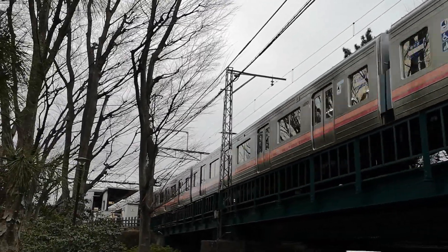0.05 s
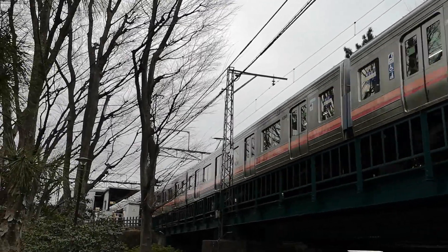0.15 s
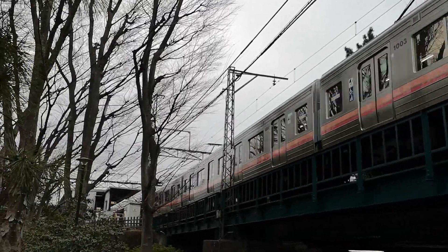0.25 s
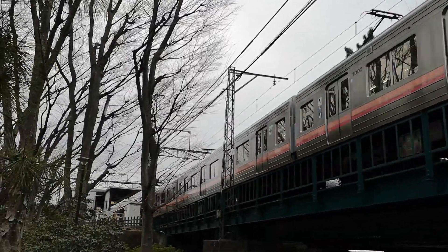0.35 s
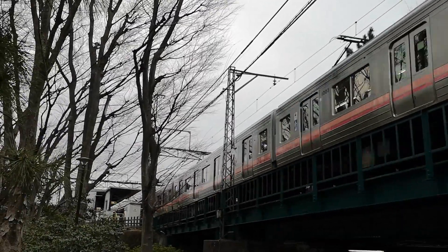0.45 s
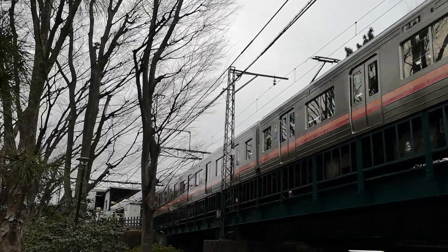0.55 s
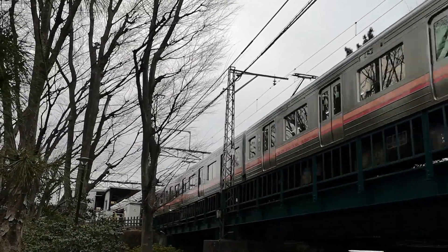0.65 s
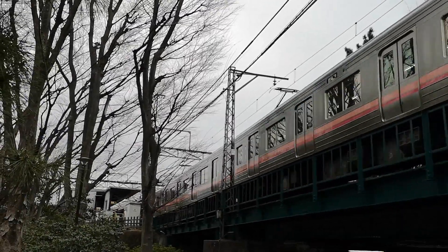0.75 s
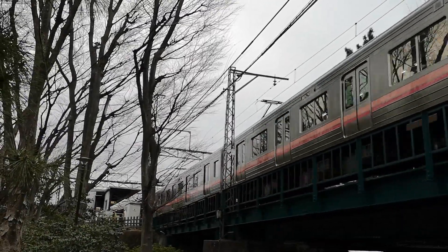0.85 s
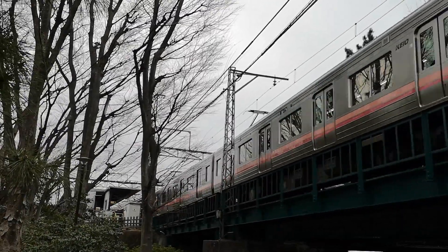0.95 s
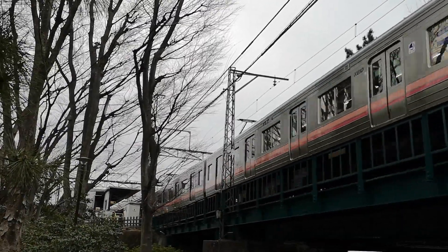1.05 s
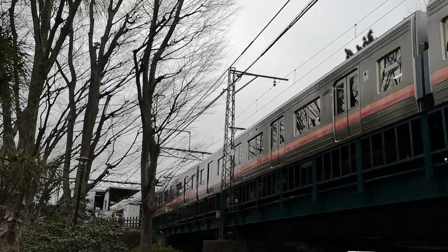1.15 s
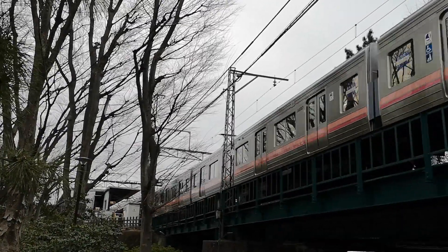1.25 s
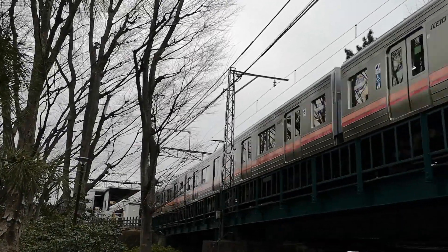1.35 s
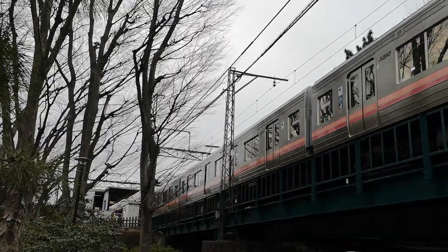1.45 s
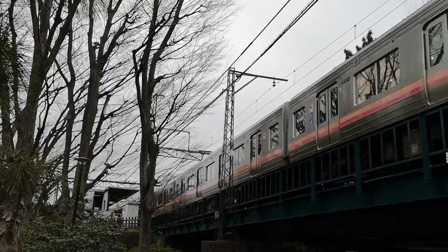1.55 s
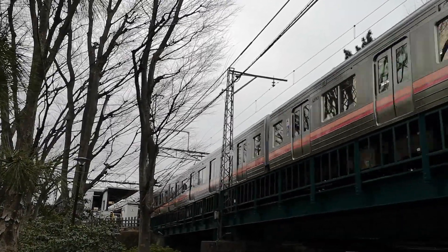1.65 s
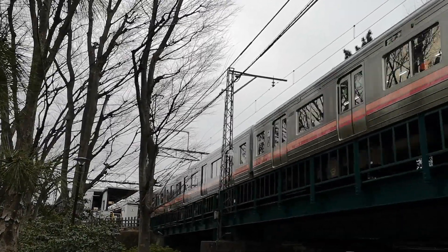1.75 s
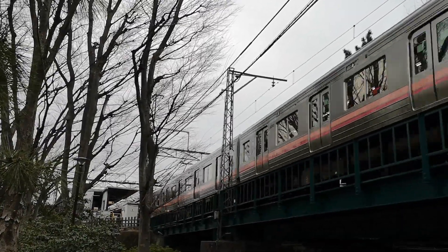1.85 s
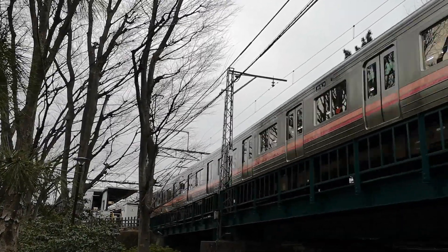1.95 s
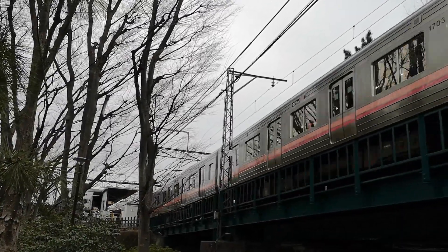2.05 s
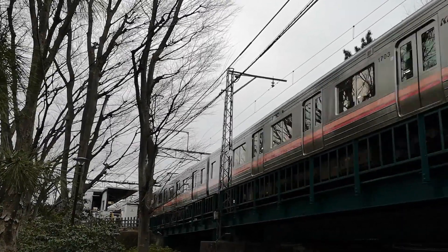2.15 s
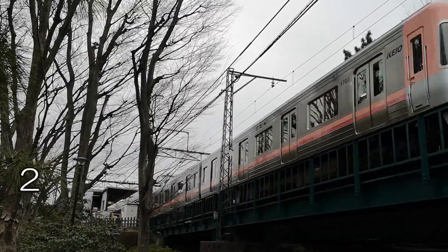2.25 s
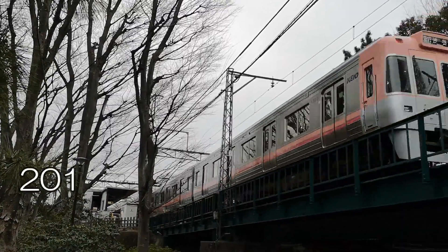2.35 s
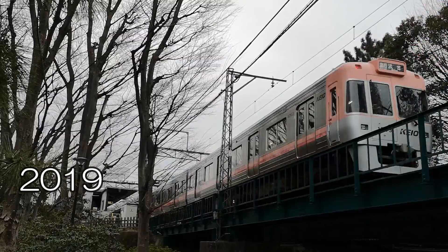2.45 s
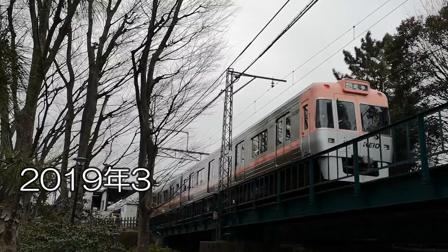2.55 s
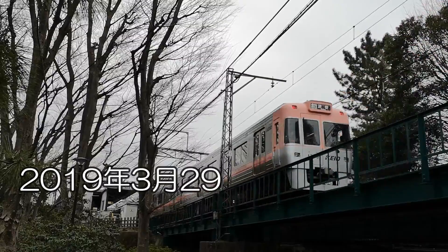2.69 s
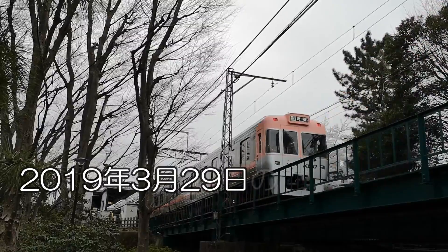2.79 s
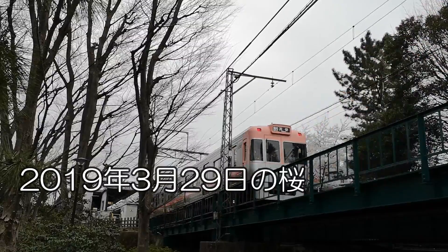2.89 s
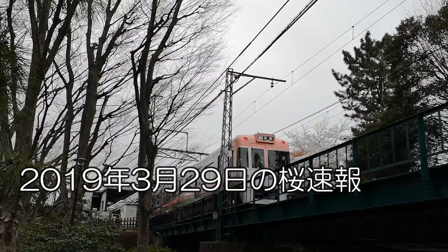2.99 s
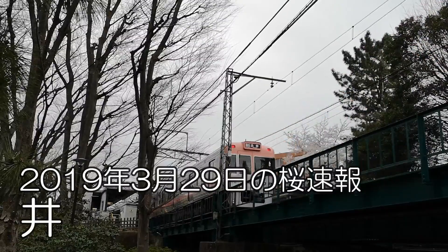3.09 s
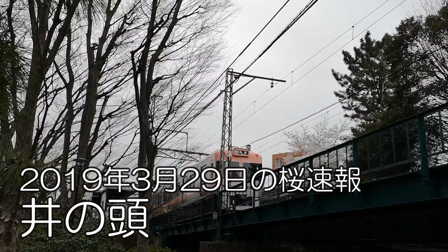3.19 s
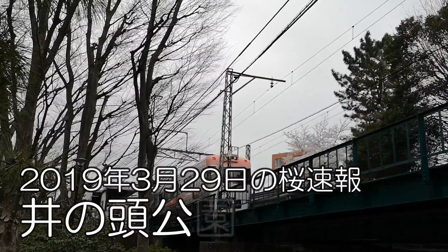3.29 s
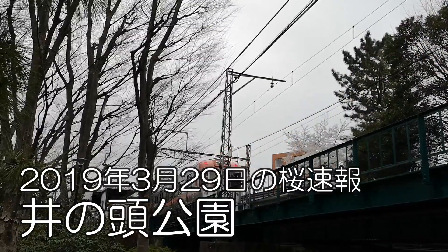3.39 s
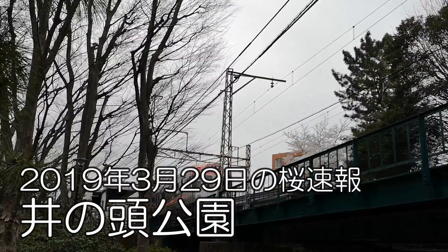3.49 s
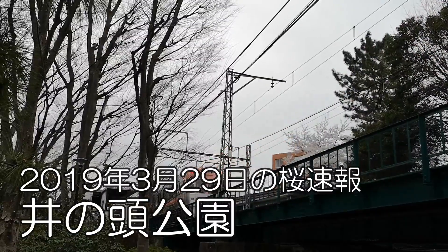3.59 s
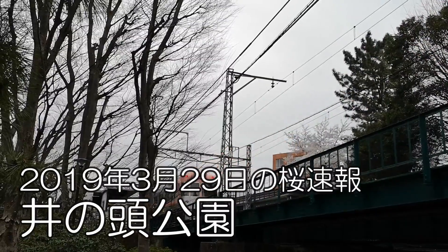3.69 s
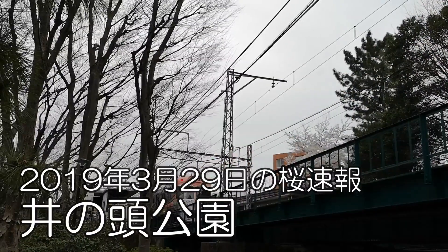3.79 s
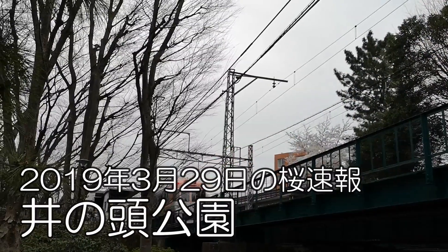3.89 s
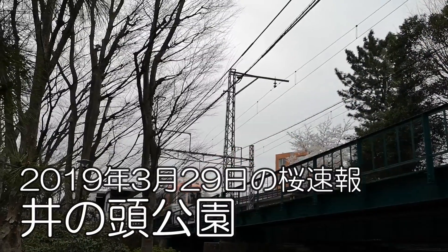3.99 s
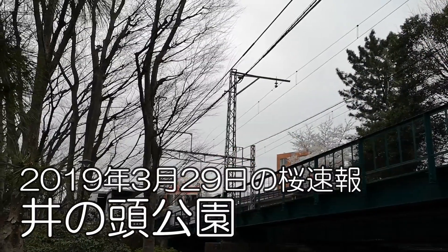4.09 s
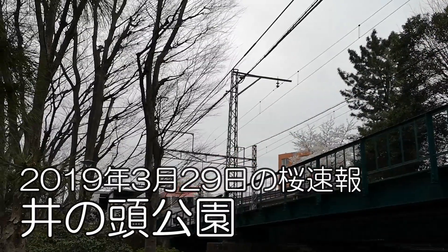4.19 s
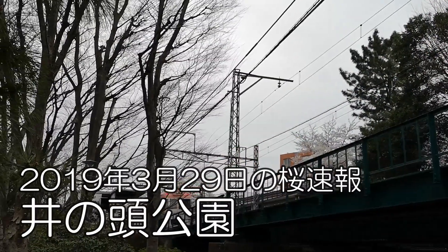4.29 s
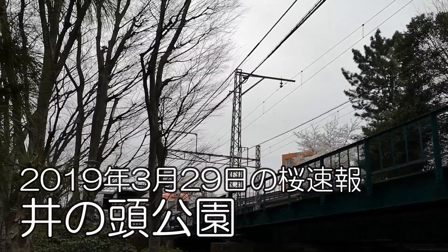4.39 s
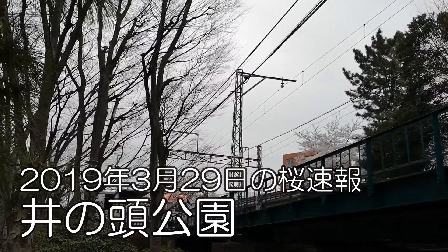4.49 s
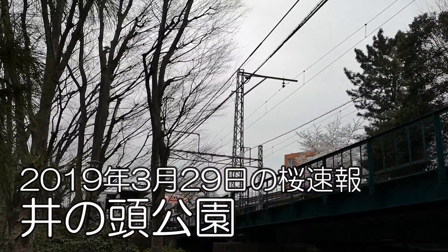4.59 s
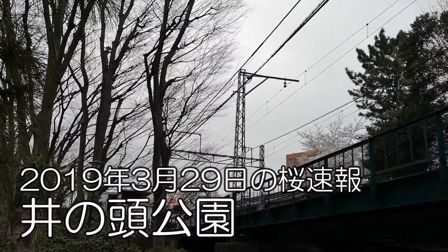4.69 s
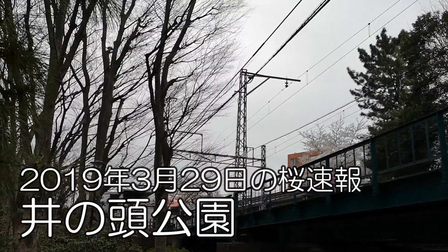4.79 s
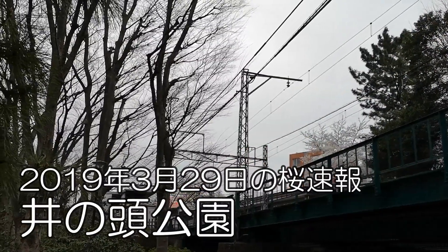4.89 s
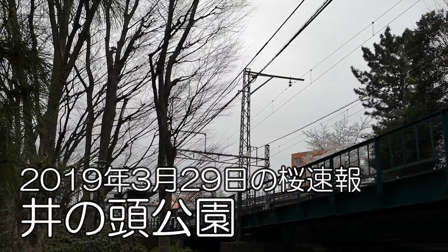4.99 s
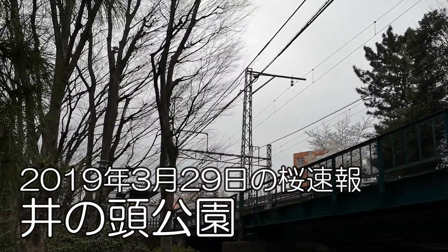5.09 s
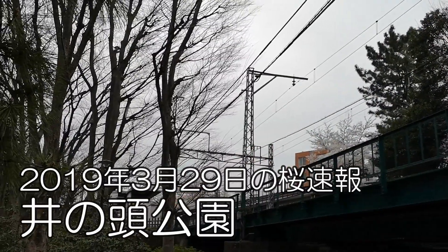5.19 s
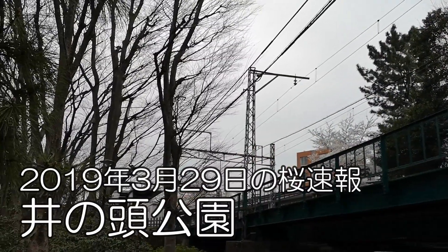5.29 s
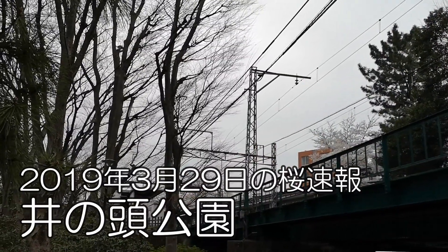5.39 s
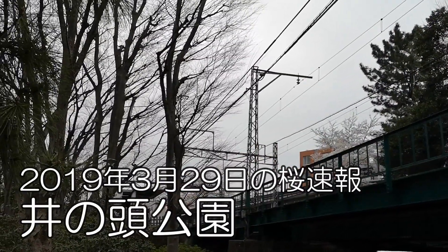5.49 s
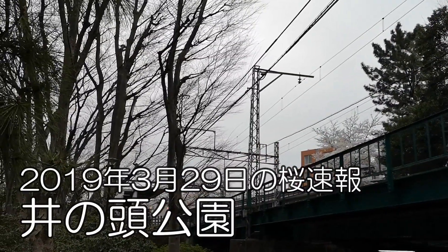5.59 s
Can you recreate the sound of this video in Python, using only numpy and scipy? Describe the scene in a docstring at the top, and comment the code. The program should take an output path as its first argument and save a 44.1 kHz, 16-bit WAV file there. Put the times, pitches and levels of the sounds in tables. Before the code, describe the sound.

An electric commuter train is already crossing a steel bridge overhead, with a booming roar, a high steady wheel ring and a hiss from the rails and wire. Deep thuds shake the girders. As the train draws away, its axles clank in pairs over a rail joint, with a few dry ticks. The roar fades into distant traffic rumble and one very faint bird whistle. Heard outdoors in stereo from just below the bridge.

```python
"""A booming, ringing roar: an electric train crosses a steel bridge overhead and draws away.
Its weight shakes the girders; rough rails set deck plates, wheels and rails ringing.
Wheel contacts hiss, current collectors fizz on the wire, loose fittings sizzle.
Bogies thud on the span and axle pairs clank over a rail joint, with a few dry ticks.
Once the train is far, a small bird whistles faintly over the rumble of distant traffic."""
import sys
import numpy as np
from scipy import signal
from scipy.io import wavfile
from scipy.ndimage import uniform_filter1d

SR = 44100
rng = np.random.default_rng(int(sys.argv[2]) if len(sys.argv) > 2 else 0)


def unload_audio(sound):
    """Save the sound as a 16-bit wav file, at the path given as the first command line argument."""
    columns = np.transpose(np.atleast_2d(sound))
    # keep every value between -1 and 1, then stretch to whole-number steps
    steps = np.round(np.clip(columns, -1, 1) * 32767)
    wavfile.write(sys.argv[1], SR, steps.astype(np.int16))


N = 248724

# Microphone pair, train overhead. Each row: frequency in Hz, coherence from 0 to 1,
# left phase lead in radians, left minus right in dB.
STEREO_OVERHEAD = [(0, 1, 0, 0), (170, .98, -.4, 0), (340, .88, -1.3, -.5), (690, .62, -2.4, -6),
                   (1030, .5, -1.8, -2.5), (1460, .25, -2.2, 2), (1900, .5, -4.1, 6), (2400, .3, -4.8, 4.5),
                   (3000, .55, -7.1, 1), (4300, .4, -10.2, 5), (5800, .36, -15.5, 11.5),
                   (7300, .36, -20.5, 11), (10500, .14, -31.5, -8), (14000, .1, -43, -3.5)]
# Change with the train far off. Each row: frequency in Hz, share of coherence kept,
# added lead in radians, added left minus right in dB.
STEREO_AWAY = [(200, 1, .3, 0), (380, .58, 2.1, 0), (690, .43, 4.6, 8), (1030, .5, 2.2, 3.5),
               (1460, 1, 2.6, -2), (2100, .5, 5.7, -2), (3000, .9, 6.5, -.5), (3700, .35, 6.5, -1),
               (5800, .4, 6.5, -3.5)]

# Noise spectra. Each row: frequency in Hz, relative density in dB.
GIRDER_SPECTRUM = [(8.8, -31), (15, -29), (60, 4.5), (97, -7), (140, -7), (217, -12.5), (300, -15.5),
                   (390, -65)]
DECK_SPECTRUM = [(88, -35), (150, 11.5), (228, -19), (366, -7.5), (433, -7), (972, -2), (1060, -1),
                 (1420, -7.5), (1900, -8.5), (2180, -36), (2440, -11.5), (4200, -25.5), (5460, -54)]
HISS_SPECTRUM = [(1880, -22), (3200, -12), (4110, -3.5), (5150, 2), (5850, 0), (6180, -4), (6940, -1),
                 (7640, -4.5), (8470, -21), (9000, -18), (11700, -59), (19800, -120)]
FIZZ_SPECTRUM = [(4710, -15), (8000, -1), (8470, -4.5), (10700, -6.5), (14400, -14.5), (15300, -18)]
TRAFFIC_SPECTRUM = [(15, 11), (35, -8), (60, 1), (110, -23.5), (200, -53), (500, -21)]
CLANK_SPECTRUM = [(300, 3.5), (750, -2.5), (1000, -6), (1400, -2.5), (3000, -12), (4500, -23),
                  (7000, -25.5), (9000, -38), (15000, -57)]

# Resonances. Each row: centre in Hz, width in Hz, relative level in dB.
DECK_MODES = [(267, 170, -5.5), (353, 94, 3.5), (488, 83, -5)]
WHEEL_MODES = [(1974, 356, 9), (2040, 100, 8.5), (2370, 560, 7), (2487, 95, 7.5), (2790, 1130, 1)]
RAIL_MODES = [(703, 100, 0), (964, 290, -1), (1860, 70, 2)]
# Low modes of the span. Each row: frequency in Hz, relative level in dB.
SPAN_MODES = [(58, 4.5), (104, 0), (133, 2.5), (160, -2), (205, -6.5), (245, -7.5)]

# Boom as weight rolls along the span. Each row: time in seconds, level in dB.
GIRDER_LEVELS = [(0, -22), (.3, -25.5), (2.0, -27), (2.82, -29), (3.15, -27.5), (3.68, -34), (3.84, -32),
                 (3.96, -34), (4.4, -38.5), (4.5, -48), (4.6, -39), (5.06, -41.5), (5.64, -50.5)]
# The train's passage. Each row: time in seconds, span shaking in dB, wheel rolling in dB.
PASS_LEVELS = [(0, -31.5, -30.5), (.3, -30.5, -29), (.62, -30.5, -28.5), (1.16, -29.5, -30),
               (1.8, -30.5, -31), (2.0, -31, -33.5), (2.4, -33, -36.5), (2.8, -34.5, -40.5),
               (3.15, -38, -39.5), (3.3, -38, -44), (3.68, -42, -44), (3.9, -39.5, -40.5),
               (4.04, -48, -45.5), (4.2, -38.5, -44), (4.38, -44.5, -44), (4.52, -46.5, -48.5),
               (5.06, -48, -50.5), (5.64, -54, -54.5)]
# Box-like ring of the loaded deck. Each row: time in seconds, level in dB.
HOLLOW_LEVELS = [(0, -28.5), (.39, -33.5), (.44, -23), (.5, -28.5), (.7, -30.5), (4.07, -49), (5.64, -56)]
# The roar drops as the last cars reach the far span. Each row: time in seconds, pitch factor.
DECK_PITCH = [(2.9, 0.97), (3.7, 0.9)]
# Cars with a current collector. Each row: closest approach in seconds, fizz level in dB.
MOTOR_CARS = [(.85, -44.5), (1.65, -52.5)]
# Bogies loading the span. Each row: start in seconds, level in dB, T60 in seconds,
# gain of all modes above the lowest in dB.
BOGIE_LOADS = [(0.333, -19.5, 0.77, -1), (0.435, -17, 0.46, -7), (1.494, -17.5, 0.44, 0),
               (2.62, -18.5, 0.6, -9.5), (2.684, -16, 0.35, 5), (3.724, -23.5, 0.29, 4),
               (3.852, -18, 0.33, 1)]
# Axles over the joint; the row at 2.934 s adds a sharp head to the clack at 2.925 s. Each row: start in
# seconds, nominal clank peak in dB, wheel ring in dB, rail ring in dB, T60 in seconds.
AXLE_KNOCKS = [(0.575, -33, -25, -45, 0.59), (0.695, -37, -27.5, -50, 0.8), (2.179, -21, -24, -45, 0.11),
               (2.567, -23.5, -37, -34, 0.43), (2.68, -26.5, -36, -37, 0.95),
               (2.925, -25.5, -41, -41, 0.87), (2.934, -22.5, -40, -28, 0.14),
               (3.055, -23.5, -36, -44, 0.65), (3.349, -27, -54, -48, 1.05),
               (3.464, -29, -35.5, -33.5, 0.61), (3.73, -23, -44, -50, 0.96), (3.859, -26, -35, -52, 0.9),
               (4.152, -33.5, -60, -40, 2.3), (4.278, -28, -51, -39.5, 0.51)]
# Dry ticks. Each row: start in seconds, peak in dB, band reference in Hz.
TICKS = [(3.352, -45, 10500), (3.615, -50, 10800), (3.895, -46, 10500), (4.17, -50, 11000),
         (5.554, -49, 6100), (5.612, -48, 7800)]
# Bird's whistle. Each row: time in seconds, pitch in Hz.
BIRD_PITCH = [(5.2, 10500), (5.26, 11150), (5.3, 10850), (5.345, 10000), (5.4, 10700), (5.445, 10850),
              (5.48, 11400), (5.52, 11200), (5.575, 10450), (5.6, 9600)]

BASS_TOP_HZ, MID_TOP_HZ, TREBLE_TOP_HZ = 700, 6000, 16000
KNOCK_START_S, CLANK_DB, WHEEL_RING_DB, RAIL_RING_DB, KNOCK_T60_S = np.transpose(AXLE_KNOCKS)
TIME_S = np.arange(N) / SR


def gain(db):
    """Decibels to amplitude."""
    return 10 ** (np.asarray(db) / 20)


def unit_rms(x):
    """Scale to rms 1."""
    return x / np.sqrt(np.mean(x ** 2) + 1e-20)


def curve(table, at=TIME_S, column=1):
    """One column, interpolated along the first."""
    columns = np.transpose(table)
    return np.interp(at, columns[0], columns[column])


def spectrum(table, hz):
    """Amplitude from a spectrum table, on a log-frequency axis."""
    points_hz, db = np.transpose(table)
    return gain(np.interp(np.log(hz + 1), np.log(points_hz + 1), db, left=-100, right=-100))


def resonances(table, hz):
    """Amplitude response of steep resonances, summed in power."""
    return np.sqrt(sum(gain(db) ** 2 / (1 + (2 * (hz - centre_hz) / width_hz) ** 2) ** 2
                       for centre_hz, width_hz, db in table))


def stereo_image(hz, t, leaves_s=1.63, far_s=2.8):
    """Complex coherence and balance in dB, moving from overhead to far off."""
    gone = np.clip((t - leaves_s) / (far_s - leaves_s), 0, 1)
    coherence, lead_rad, balance_db = (curve(STEREO_OVERHEAD, hz, column) for column in (1, 2, 3))
    kept, turn_rad, shift_db = (curve(STEREO_AWAY, hz, column) for column in (1, 2, 3))
    change = 1 - gone + gone * kept * np.exp(-1j * turn_rad)
    return coherence * np.exp(-1j * lead_rad) * change, balance_db + gone * shift_db


def noise(shape, fft_size, top_hz, *, patchy_db, flicker_db):
    """Stereo noise shaped by shape(hz, t), with drifting patches and wide-band flicker; mid rms 1."""
    hop = fft_size // 4
    t = np.arange(N // hop + 5) * hop / SR
    hz = np.arange(0, top_hz, SR / fft_size)[:, None]
    draws = rng.standard_normal((len(t), len(hz), 5), np.float32).T
    left, independent = draws[0] + 1j * draws[1], draws[2] + 1j * draws[3]
    patches = unit_rms(uniform_filter1d(uniform_filter1d(draws[4], size=5, axis=0), size=12, axis=1))
    flicker = unit_rms(uniform_filter1d(rng.standard_normal(len(t)), size=3))
    coherence, balance_db = stereo_image(hz, t)
    right = coherence * left + np.sqrt(1 - abs(coherence) ** 2 + 1e-9) * independent
    tilt = gain(balance_db / 2)
    pair = np.array([left * tilt, right / tilt])
    pair /= np.sqrt(tilt ** 2 + tilt ** -2 + 2 * coherence.real)  # shape holds for the channel sum
    bins = np.zeros((2, fft_size // 2 + 1, len(t)), complex)
    bins[:, :len(hz)] = pair * shape(hz, t) * gain(patchy_db * patches + flicker_db * flicker)
    out = signal.istft(bins, nperseg=fft_size, noverlap=fft_size - hop)[1][:, :N]
    return out / np.sqrt(np.mean(out.mean(0) ** 2))


def follow_pass(column, overhead_db, slope, pass_overhead_db=-30):
    """Gain that moves by slope dB for each dB of a PASS_LEVELS column."""
    return gain(overhead_db + slope * (curve(PASS_LEVELS, column=column) - pass_overhead_db))


def knock_power(levels_db, rise_s, decay_speed=1):
    """Power envelope of the axle knocks, up to 1 s each."""
    power = np.zeros(N)
    for start_s, t60_s, db in zip(KNOCK_START_S, KNOCK_T60_S, levels_db):
        start = round(start_s * SR)
        age_s = np.maximum(TIME_S[start:start + SR] - start_s, 0)
        envelope = gain(db - 60 * decay_speed * age_s / t60_s) * (1 - np.exp(-age_s / rise_s))
        power[start:start + SR] += envelope ** 2
    return power


def motor_cars(t, go_by_s=0.42, loss_db_per_decade=36.5, mach=0.029, pitch_centre=0.9973):
    """Summed power and mean Doppler factor of the passing motor cars."""
    closest_s, db = np.transpose(MOTOR_CARS)[:, :, None]
    along = (t - closest_s) / go_by_s  # in units of the closest distance
    distance = np.sqrt(1 + along ** 2)
    power = gain(db - loss_db_per_decade * np.log10(distance)) ** 2
    receding = (power * along / distance).sum(0) / power.sum(0)
    return power.sum(0), pitch_centre - mach * receding


def girders():
    """The girders boom under the rolling weight, low and near mono."""
    boom = noise(lambda hz, t: spectrum(GIRDER_SPECTRUM, hz), 4096, BASS_TOP_HZ,
                 patchy_db=3.0, flicker_db=-1.34)
    return boom * gain(curve(GIRDER_LEVELS))


def deck():
    """Rough rails shake the deck plates: a broad roar and a hollow ring."""
    roar = noise(lambda hz, t: spectrum(DECK_SPECTRUM, hz / curve(DECK_PITCH, t)), 1024, MID_TOP_HZ,
                 patchy_db=1.0, flicker_db=0.6)
    hollow = noise(lambda hz, t: resonances(DECK_MODES, hz), 2048, MID_TOP_HZ / 2,
                   patchy_db=1.0, flicker_db=1.2)
    return roar * gain(curve(PASS_LEVELS)) + hollow * gain(curve(HOLLOW_LEVELS))


def wheels():
    """Roughness and knocks ring the wheel modes; pitch sags as a motor car goes by."""
    ring = noise(lambda hz, t: resonances(WHEEL_MODES, hz / motor_cars(t)[1]), 1024, MID_TOP_HZ,
                 patchy_db=0.5, flicker_db=0.84)
    rolling = gain(curve(PASS_LEVELS, column=2))
    return ring * np.sqrt(rolling ** 2 + knock_power(WHEEL_RING_DB, rise_s=0.016))


def rails():
    """The rails carry their ring back along the track, fading slowly; knocks make it flare."""
    ring = noise(lambda hz, t: resonances(RAIL_MODES, hz), 1024, MID_TOP_HZ / 2,
                 patchy_db=2.0, flicker_db=5.5)
    shaking = follow_pass(column=1, overhead_db=-42, slope=0.83)
    return ring * np.sqrt(shaking ** 2 + knock_power(RAIL_RING_DB, rise_s=0.006))


def contacts(driven_lead_s=0.15, driven_over_fizz_db=7.5):
    """Wheels hiss on the rail, collectors fizz along the wire; each knock adds a faint spit."""
    hiss = noise(lambda hz, t: spectrum(HISS_SPECTRUM, hz), 512, TREBLE_TOP_HZ,
                 patchy_db=0.65, flicker_db=0.5)
    fizz = noise(lambda hz, t: spectrum(FIZZ_SPECTRUM, hz), 512, TREBLE_TOP_HZ,
                 patchy_db=0.5, flicker_db=1.0)
    rolling = follow_pass(column=2, overhead_db=-41.5, slope=1.264)
    spit_power = knock_power(CLANK_DB, rise_s=0.0016, decay_speed=4.8)
    # Driven wheels pass ahead of the collector.
    driven_power = motor_cars(TIME_S + driven_lead_s)[0] * gain(driven_over_fizz_db) ** 2
    hiss_power = rolling ** 2 + driven_power + spit_power * gain(-43) ** 2
    fizz_power = motor_cars(TIME_S)[0] + spit_power * gain(-50) ** 2
    return hiss * np.sqrt(hiss_power) + fizz * np.sqrt(fizz_power)


def fittings(level_db=-69.5, end_s=4.46, fade_s=0.04):
    """Loose steel sizzles until the last car is off the span."""
    sizzle = noise(lambda hz, t: spectrum(FIZZ_SPECTRUM, hz), 256, TREBLE_TOP_HZ,
                   patchy_db=4.5, flicker_db=1.0)
    return gain(level_db) * sizzle * np.clip((end_s - TIME_S) / fade_s, 0, 1)


def traffic(level_db=-43):
    """Far traffic: a lumpy rumble that outlasts the train."""
    return gain(level_db) * noise(lambda hz, t: spectrum(TRAFFIC_SPECTRUM, hz), 4096, BASS_TOP_HZ,
                                  patchy_db=3.0, flicker_db=0.5)


def bogie_thuds(rise_s=0.013, detune_range=0.132):
    """The span's low modes swell under a bogie and die away."""
    out, t = np.zeros(N), TIME_S[:SR]
    mode_hz, mode_db = np.transpose(SPAN_MODES)[:, :, None]
    for start_s, db, t60_s, upper_db in BOGIE_LOADS:
        detune, phase = rng.random((2, len(mode_hz), 1))
        hz = mode_hz * (1 + detune_range * (detune - 0.5))
        weights = gain(mode_db + upper_db * (mode_hz > mode_hz[0]))
        ring = (weights * np.sin(2 * np.pi * (hz * t + phase))).sum(0)
        envelope = gain(db - 60 * t / t60_s) * (1 - np.exp(-t / rise_s))
        out[round(start_s * SR):][:len(t)] += envelope * unit_rms(ring)
    return out


def joint_clanks(crest_db=9):
    """Each axle drops over the rail gap: a smeared clank of the deck."""
    clank = noise(lambda hz, t: spectrum(CLANK_SPECTRUM, hz), 512, TREBLE_TOP_HZ,
                  patchy_db=2.5, flicker_db=-2.0)
    return clank * np.sqrt(knock_power(CLANK_DB - crest_db, rise_s=0.00079))


def ticks(rise_s=0.001, t60_s=0.03):
    """Bright snaps of noise, a few milliseconds each."""
    out, t = np.zeros((2, N)), TIME_S[:600]
    envelope = gain(-60 * t / t60_s) * (1 - np.exp(-t / rise_s))
    for start_s, peak_db, hz in TICKS:
        band = signal.butter(2, [0.57 * hz, 1.1 * hz], "bandpass", fs=SR)
        snap = signal.lfilter(*band, rng.standard_normal((2, len(t)))) * envelope
        out[:, round(start_s * SR):][:, :len(t)] += gain(peak_db) * snap / abs(snap).max()
    return out


def bird(level_db=-81, fade_s=0.02, pitch_jitter=0.005, shimmer_db=3.5):
    """A thin, wavering whistle, right of centre."""
    start_s, end_s = BIRD_PITCH[0][0], BIRD_PITCH[-1][0]
    pitch_wobble, level_wobble = unit_rms(uniform_filter1d(rng.standard_normal((2, N)), size=200))
    hz = uniform_filter1d(curve(BIRD_PITCH), size=400) * (1 + pitch_jitter * pitch_wobble)
    tone = np.sqrt(2) * np.sin(2 * np.pi * np.cumsum(hz) / SR)
    gate = np.clip(np.minimum(TIME_S - start_s, end_s - TIME_S) / fade_s, 0, 1)
    loudness = uniform_filter1d(gain(level_db + shimmer_db * level_wobble), size=200)
    return tone * gate * loudness * gain([[-3], [3]])


def scene():
    """All sources at the microphone pair."""
    return (girders() + deck() + wheels() + contacts() + joint_clanks() + bogie_thuds()
            + traffic() + bird() + ticks() + fittings() + rails())


def record(dry, cutoff_hz=15380):
    """Steep low-pass band limit."""
    lowpass = signal.firwin(1023, cutoff_hz, window=("kaiser", 9), fs=SR)
    return signal.oaconvolve(dry, lowpass[None], "same")


dry = scene()
out = record(dry)
unload_audio(out)
```